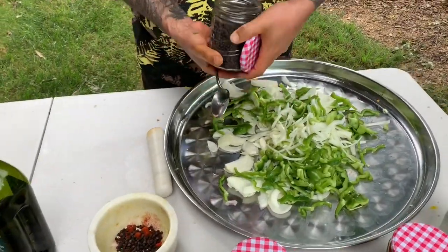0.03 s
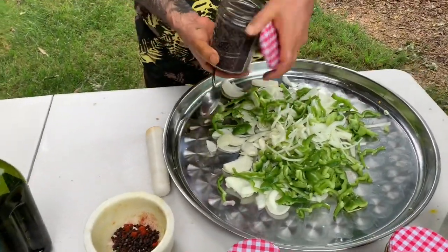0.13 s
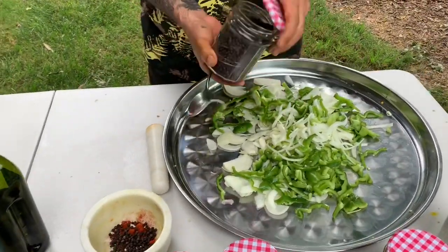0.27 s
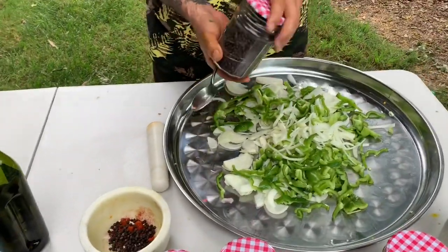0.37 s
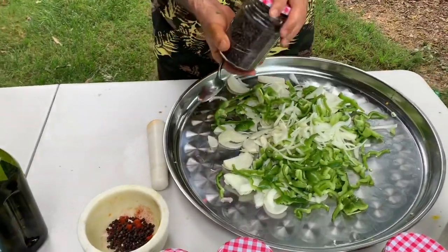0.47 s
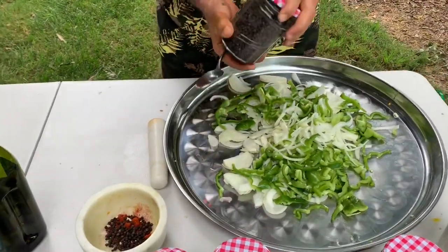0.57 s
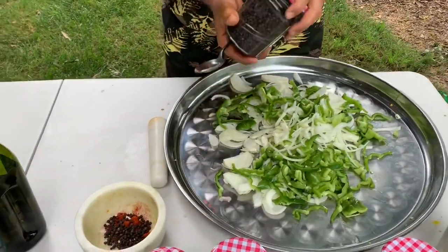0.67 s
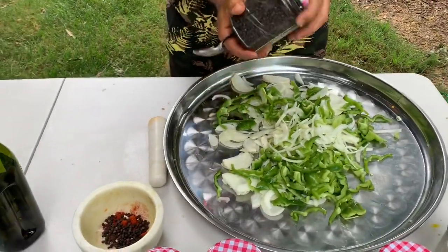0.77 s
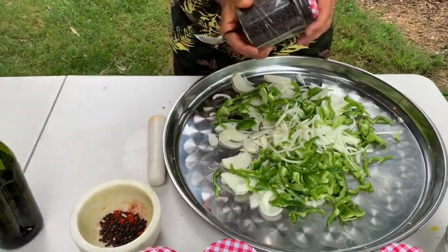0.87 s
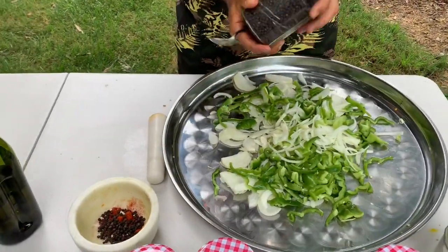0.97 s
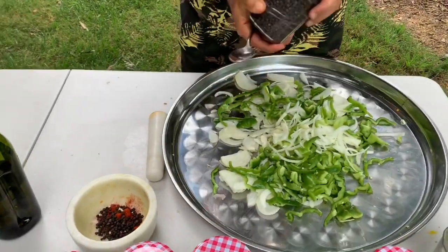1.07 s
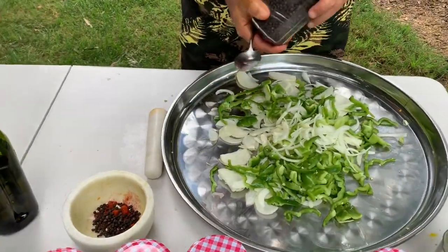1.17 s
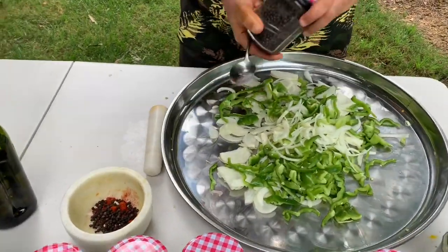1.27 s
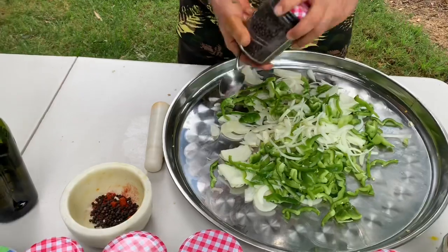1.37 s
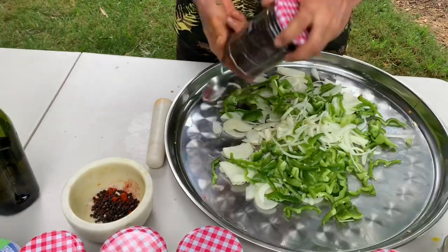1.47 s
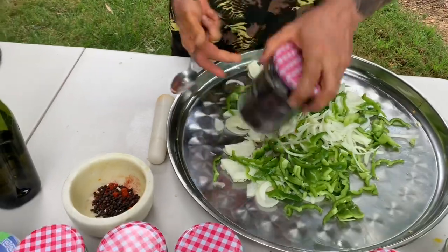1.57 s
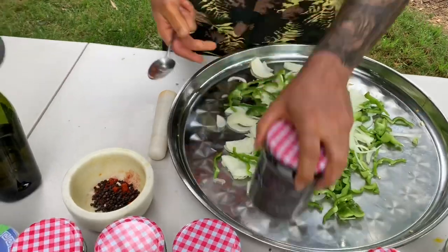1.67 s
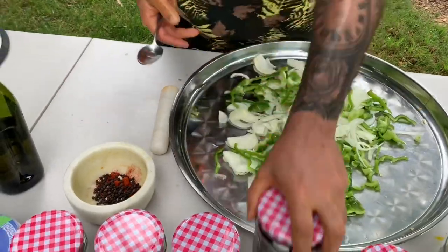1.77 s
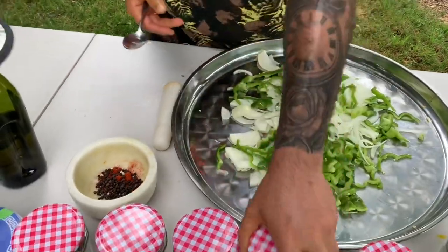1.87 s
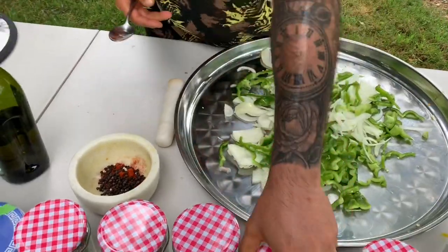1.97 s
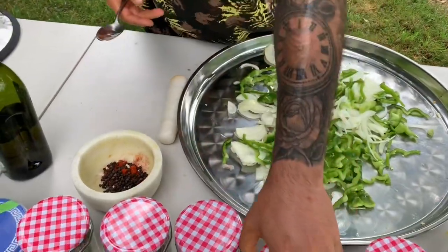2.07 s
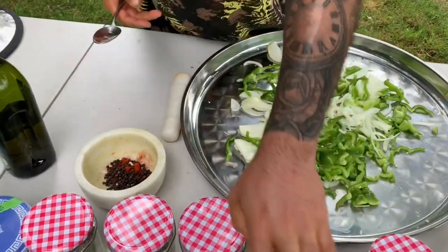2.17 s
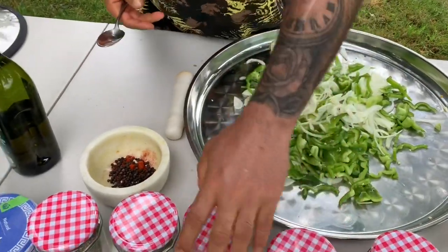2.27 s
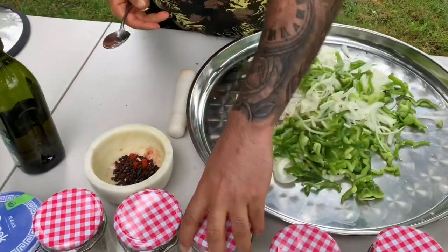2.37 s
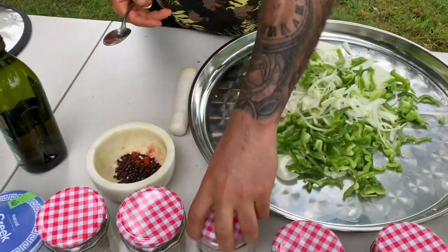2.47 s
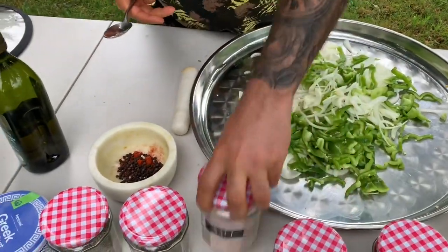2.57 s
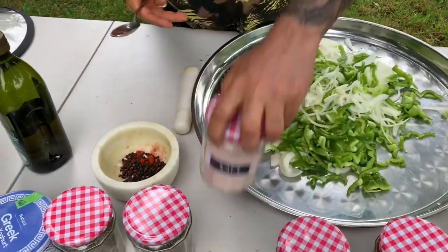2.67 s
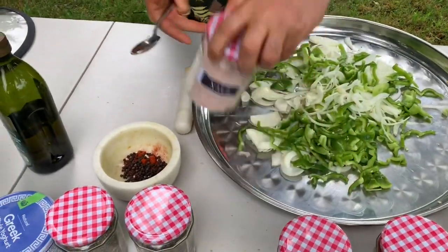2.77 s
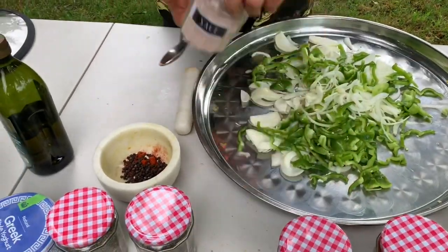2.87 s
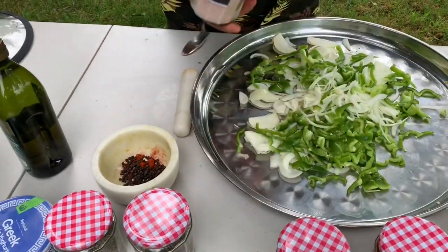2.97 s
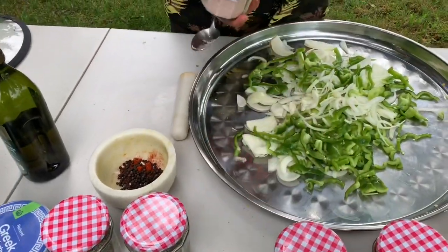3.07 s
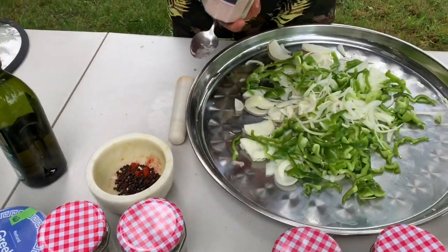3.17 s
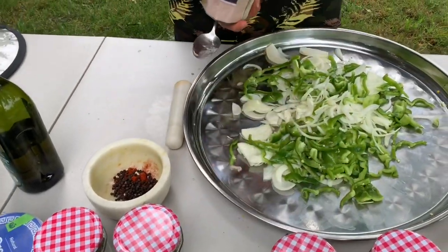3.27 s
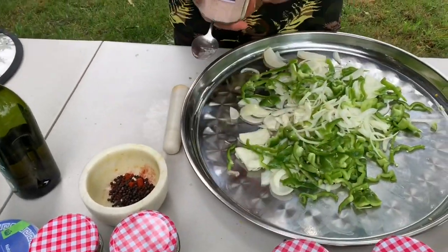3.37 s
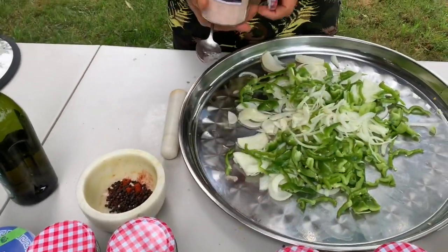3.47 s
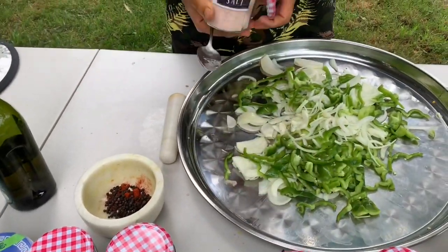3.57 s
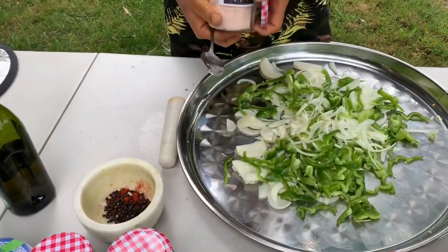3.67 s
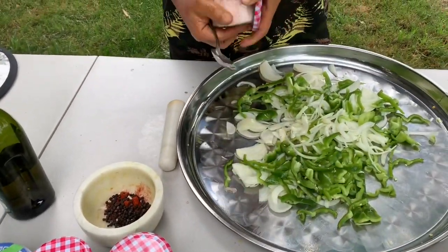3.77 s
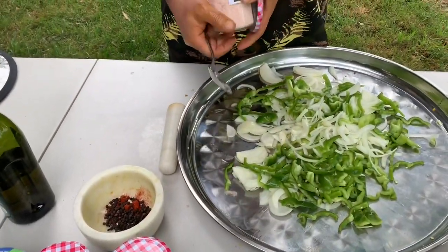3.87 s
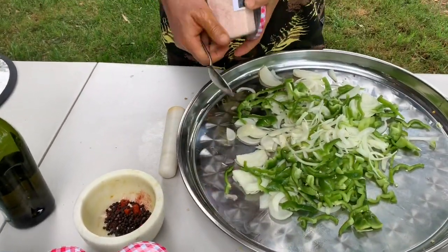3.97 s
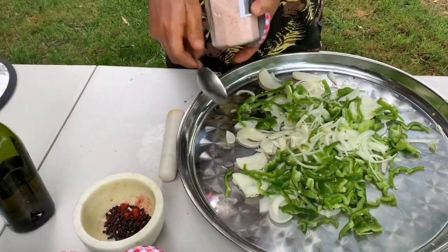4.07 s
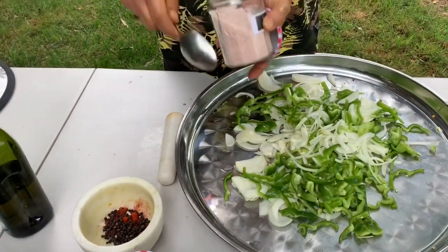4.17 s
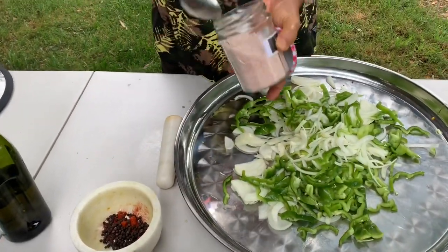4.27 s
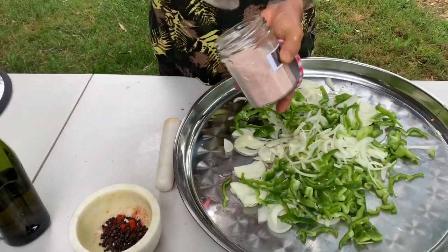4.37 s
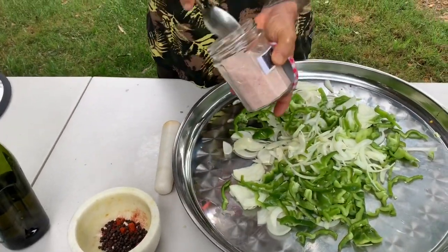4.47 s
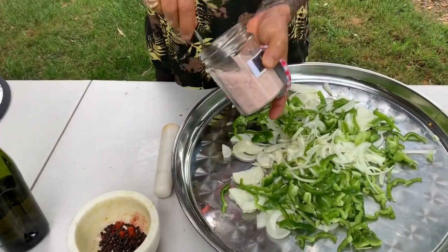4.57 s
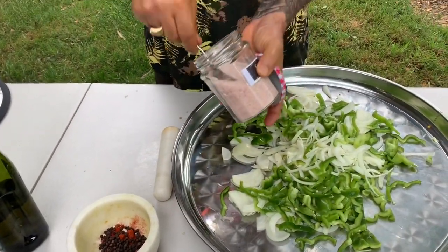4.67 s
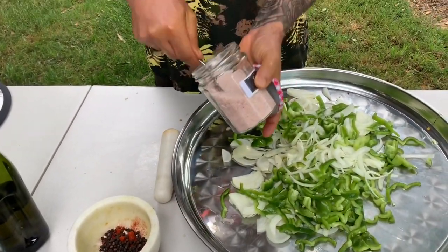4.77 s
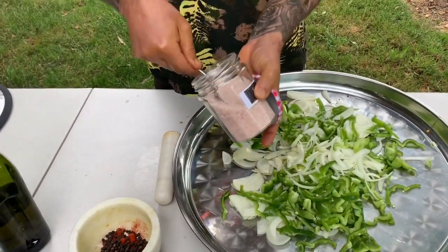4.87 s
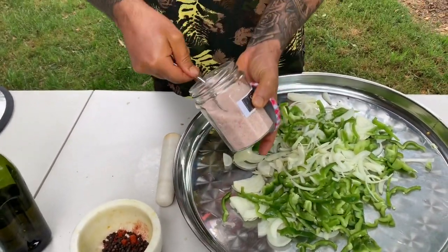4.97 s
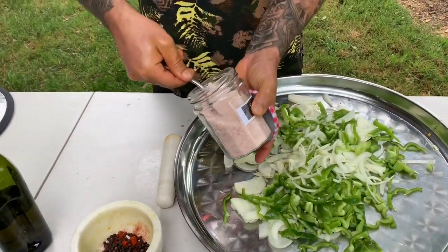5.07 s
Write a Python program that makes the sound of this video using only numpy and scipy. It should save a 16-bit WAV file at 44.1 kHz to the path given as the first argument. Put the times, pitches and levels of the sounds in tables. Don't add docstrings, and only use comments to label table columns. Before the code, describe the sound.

Outdoors, jar lids scrape and click, a heavy boomy knock hits the plastic table, jars clink, and a metal spoon taps glass.

```python
import sys
import numpy as np
from scipy import signal
from scipy.fft import rfft, irfft, next_fast_len
from scipy.io import wavfile
from scipy.ndimage import map_coordinates

SR = 44100
rng = np.random.default_rng(int(sys.argv[2]) if len(sys.argv) > 2 else 0)


def digitize_waveform(pressure):
    field = np.atleast_2d(pressure).T
    bounded = np.clip(field, -1, 1)
    quanta = np.round(bounded * 32767).astype(np.int16)
    wavfile.write(sys.argv[1], SR, quanta)


def gain_from_db(level_db):
    decades = np.asarray(level_db, float) / 20
    return 10 ** decades


N = 225218


def unit(x):
    return x / np.sqrt(np.mean(x ** 2) + 1e-20)


def peak_one(x):
    return x / np.abs(x).max()


def along(points, hz):
    f, v = np.transpose(points)
    return np.interp(np.log(hz + 1), np.log(f + 1), v)


def filtered(x, response):
    n = x.shape[-1]
    m = next_fast_len(n + 4096)
    return irfft(rfft(x, m) * response(np.fft.rfftfreq(m, 1 / SR)), m)[..., :n]


def band(centre_hz, width_hz):
    return lambda f: (1j * f * width_hz / (centre_hz ** 2 - f * f + 1j * f * width_hz)) ** 2


def noise(spectrum, shape=N):
    return unit(filtered(rng.standard_normal(shape), lambda hz: gain_from_db(along(spectrum, hz))))


def wobble(rate):
    return map_coordinates(rng.standard_normal(int(N * rate / SR) + 4), [np.arange(N) * rate / SR])


def swells(s, hold, db, release, attack):
    t = np.arange(0, N / SR, 1 / 1000)[:, None]
    early = np.maximum(s - t, 0)
    late = np.maximum(t - s - np.abs(hold), 0)
    gain = gain_from_db(db - 20 * early / np.abs(attack) - 20 * late / np.abs(release)).sum(axis=1)
    return np.interp(np.arange(N) / SR, t[:, 0], gain)


# f/Hz, density/dB
BACKGROUND_SPECTRUM = [(20, -50), (42, -28), (65, -4.5), (180, -15), (370, -20), (430, -12), (600, -23),
                       (1400, -28), (3700, -44), (10800, -45.5), (11700, -72), (12700, -50), (14300, -46.5),
                       (15000, -80)]
# f/Hz, left-right likeness
COHERENCE = [(60, 0.73), (130, 0.83), (290, 1), (640, -0.086), (1410, -0.78), (3100, -0.65), (6820, -1.1),
             (15000, 1)]


def open_air():
    def mid_and_side(hz):
        angle = np.arccos(np.clip(along(COHERENCE, hz), -1, 1)) / 2
        return gain_from_db(along(BACKGROUND_SPECTRUM, hz)) * [np.cos(angle), np.sin(angle)]

    mid, side = filtered(rng.standard_normal((2, N)), mid_and_side)
    left_right = unit(np.array([mid + side, mid - side]))
    return gain_from_db(-62 + 0.59 * wobble(1.2)) * left_right * gain_from_db([[1.1], [-1.1]])


# t/s, hold/s, level/dB, release/s, attack/s
LEG_SWAY = (2.0, .35, -55, .12, .04)


def low_hum():
    hum = noise([(20, -62.5), (40, -18.5), (60, 1.0), (80, -10.0), (140, -61.5)])
    return (gain_from_db(-60.5) + swells(*LEG_SWAY)) * hum


# t/s, hold/s, level/dB, release/s, attack/s
FAR_TONE = (2.55, .33, -74, .12, .07)


def far_tone():
    tone = np.sin(2 * np.pi * 810 * np.arange(N) / SR)
    return swells(*FAR_TONE) * gain_from_db(2.74 * wobble(7.1)) * tone


# f/Hz, width/Hz, level/dB
CHORUS_BANDS = [(2700, 330, 0.5), (8100, 250, -11.5)]
# t/s, hold/s, level/dB, release/s, attack/s
CHORUS_SWELL = (4.93, .1, -78, .06, .05)


def far_insects():
    chorus = 0
    for hz, width, db in CHORUS_BANDS:
        level = gain_from_db(db + 2.6 * wobble(1.3))
        chorus = chorus + level * unit(filtered(rng.standard_normal((2, N)), band(hz, width)))
    return (gain_from_db(-98.5) + swells(*CHORUS_SWELL)) * chorus


# f/Hz, T60/s
YARD_T60 = [(200, 0.075), (2000, 0.085), (10000, 0.06)]


def yard(x):
    hz, t, z = signal.stft(rng.standard_normal((2, SR // 3)), SR, nperseg=256)
    decay = gain_from_db(-60 * t / along(YARD_T60, hz)[:, None])
    tail = signal.istft(z * decay, SR, nperseg=256)[1]
    return signal.fftconvolve(x[None], tail / np.linalg.norm(tail[0]), axes=1)[:, :N]


# t/s, length/s, level/dB
RASPS = [
    (2.12, 0.068, -62),
    (2.207, 0.061, -61.5),
    (2.758, 0.076, -62),
    (2.86, 0.13, -57),
    (3.022, 0.053, -61),
    (3.107, 0.033, -58.5),
    (3.182, 0.051, -63),
]


def insect():
    clicks = rng.standard_normal(N) * gain_from_db(1.697 * wobble(160))
    s, length, db = np.transpose(RASPS)
    bursts = swells(s + .15 * length, 0.55 * length, db - 3.5, 0.74 * length, 0.23 * length)
    low_edge = band(centre_hz=7200, width_hz=1100)
    high_edge = band(centre_hz=7900, width_hz=1300)
    return bursts * unit(filtered(clicks, lambda f: low_edge(f) * high_edge(f)))


# t/s, hold/s, hiss level/dB, release/s per 20 dB, body over hiss/dB
HAND_MOVES = [(0, 0.0033, -64.5, 0.13, 5), (0.354, 0.039, -72, -0.5, 9.5), (0.44, 0.071, -74, -0.5, -1.5),
              (0.638, 0.15, -86, 0.53, 3), (0.8, 0.22, -61.5, 0.08, -6), (1.01, 0.051, -73.5, -0.5, -24),
              (1.2, 0.21, -87, -1.24, 0.5), (1.47, 0.098, -73.5, 1.2, -7), (1.886, 0.064, -74, 0.56, 13.5),
              (1.73, 0.11, -64, 0.13, -12), (2.936, 0.024, -62.5, 0.47, -3.5),
              (3.056, 0.24, -81, 0.19, 14.5), (3.566, 0.053, -78.5, 0.57, 16),
              (3.685, 0.0034, -62, 0.18, -15.5), (4.548, 0.023, -69.5, 0.6, 2.5)]
SEED_JOLTS = [
    (1.965, .002, -46.5, 0.043, 16.5),
    (1.987, .003, -41, 0.033, -9),
    (2.006, 0.019, -36.5, 0.011, -8.5),
    (2.03, 0.0064, -51, 0.019, -1),
    (2.045, .004, -43, 0.0123, -9),
    (2.059, 0.0079, -44, 0.016, -5.5),
    (2.08, 0.022, -61, 0.057, 6.5),
]
# f/Hz, density/dB
HISS_SPECTRUM = [(1470, -34.5), (2500, -5), (5010, -7.5), (8300, -6.5), (11800, -13), (13000, -10.5),
                 (14800, -13), (16500, -44)]
BODY_SPECTRUM = [(350, -42), (600, -10.5), (777, -9), (1250, -13.5), (2640, -14), (3500, -31), (7700, -120)]
# f/Hz, width/Hz, level/dB
GLASS_BANDS = [(2340, 280, 1), (8250, 330, 3)]


def rustle():
    impulses = (rng.random(N) < 170 / SR) * rng.uniform(0, .6, N)
    ticks = signal.lfilter([1], [1, -.985], impulses)
    clumps = gain_from_db(2.6 * wobble(50) + 3 * wobble(300)) * (1 + ticks)

    def glass(f):
        return 1 + sum(gain_from_db(db) * np.abs(band(hz, width)(f)) for hz, width, db in GLASS_BANDS)

    s, hold, level_db, release, body_db = np.transpose(HAND_MOVES + SEED_JOLTS)
    attack = np.repeat([.04, .007], [len(HAND_MOVES), len(SEED_JOLTS)])
    hiss = unit(clumps * filtered(noise(HISS_SPECTRUM), glass))
    body = unit(clumps * noise(BODY_SPECTRUM))
    hiss = swells(s, hold, level_db, release, attack) * hiss
    return hiss + swells(s, hold, level_db + body_db, release, attack) * body


# t/s, f/Hz
NECK_PITCH = [
    [(.3, 270.8), (.55, 268), (.7, 261.4), (.768, 294.7), (.81, 288.5), (.85, 253.5), (.93, 249),
     (.956, 228.9), (1.03, 218.6)],
    [(2.9, 339), (2.96, 330.5), (3.03, 325.8), (3.066, 282), (3.12, 292), (3.2, 305), (3.7, 313)],
]


def neck_hz(s):
    return np.interp(s, *np.transpose(NECK_PITCH[0] + NECK_PITCH[1]))


# t/s, hold/s, level/dB, release/s, attack/s
NECK_RUBS = [
    (0.354, .04, -54, 0.032, 0.0083),
    (0.552, .07, -56.5, 0.033, .01),
    (0.721, .03, -42.5, .02, 0.017),
    (0.81, .03, -60, 0.034, 0.0092),
    (0.859, .055, -49, 0.027, .015),
    (0.935, .03, -53, 0.025, 0.018),
    (2.908, .025, -53, 0.027, .01),
    (3.095, .035, -51.5, 0.019, 0.0093),
    (3.159, .05, -58, .015, .02),
]


def neck_hum():
    phase = 2 * np.pi * np.cumsum(neck_hz(np.arange(N) / SR)) / SR
    air = unit((.6 + wobble(55)) * np.sin(phase) + wobble(55) * np.cos(phase))
    return swells(*np.transpose(NECK_RUBS)) * gain_from_db(-1.5) * air


# f/Hz, width/Hz, level/dB
BOWL_BANDS = [(12640, 540, -1.5), (15650, 116, -3), (7700, 2100, 1.5)]
# t/s, hold/s, level/dB, release/s, attack/s
BOWL_SLIDES = [
    (4.47, .02, -53, .03, .01),
    (4.513, 0.022, -61, 0.045, .005),
    (4.56, 0.11, -68.5, .05, .03),
]


def spoon_shimmer():
    def steel(f):
        return sum(gain_from_db(db) / np.sqrt(width) * band(hz, width)(f) for hz, width, db in BOWL_BANDS)

    return swells(*np.transpose(BOWL_SLIDES)) * unit(filtered(rng.standard_normal(N), steel))


def ring(modes, t, scatter_db, detune, phase_spread=1):
    hz, db, t60 = np.transpose(modes)[:, :, None]
    strength, phase, pitch, near, far = rng.standard_normal((5, len(modes), 1))
    turn = 2 * np.pi * hz * (1 + detune * pitch) * t
    group = np.sin(turn + phase_spread * phase)
    group = group + .4 * np.sin(turn * (1 + .025 * near)) + .22 * np.sin(turn * (1 + .09 * far))
    decay = gain_from_db(db + scatter_db * strength - 60 * t / t60)
    return (decay * group).sum(0) * (1 - np.exp(-t / .0003))


# f/Hz, level/dB, T60/s
JAR_AIR = [(275.3, 1, 0.044)]
# f/Hz, density/dB
SCRAPE_SPECTRUM = [(290, -55.5), (500, -27), (859, -20.5), (1430, -5.5), (1840, -10), (2040, -10),
                   (2390, -3.5), (3880, -8), (10300, -8.5), (11600, -18.5), (13100, -5.5), (16500, -36)]


def contacts(events, modes, hollow, thud_db, t60, tilt_db, thud_attack=.003, scatter_db=3, detune=.01):
    lead = SR // 50
    out, t = np.zeros(N + SR), np.arange(SR // 3) / SR
    u = t - lead / SR
    lead_in = gain_from_db(-20 + 1500 * u)
    strike = gain_from_db(-60 * u / t60) * (1.1 - np.exp(-u / (0.035 * t60)))
    force = np.where(u < 0, lead_in, strike)
    for s, db, ring_db, *low_db in events:
        grit = filtered(noise(SCRAPE_SPECTRUM, len(t)),
                        lambda hz: gain_from_db(tilt_db * np.log2(np.maximum(hz, 700) / 3000)))
        scrape = gain_from_db(-13) * force * unit(grit)
        drive = .05 * force ** 2 * rng.standard_normal(len(t))
        drive[lead + round(.05 * t60 * SR)] += 1
        flutter = map_coordinates(rng.standard_normal(180), [t * 180])
        ringing = ring(modes, t[:SR // 4], scatter_db, detune)
        driven = signal.fftconvolve(drive[:SR // 8], ringing)[:len(t)]
        body = gain_from_db(ring_db + 1.8 * flutter - 60 * t) * peak_one(driven)
        shift = neck_hz(s) / hollow[0][0] if hollow is JAR_AIR else 1
        swell = ring(hollow, shift * t, 1.5, 0.03, phase_spread=0) * (1 - np.exp(-t / thud_attack))
        thud = gain_from_db(sum(low_db) + thud_db) * peak_one(np.pad(swell, (lead, 0))[:len(t)])
        out[round(s * SR) - lead:][:len(t)] += gain_from_db(db) * (scrape + body + thud)
    return out[:N]


# f/Hz, level/dB, T60/s
TILTED_GLASS = [(860, -10.5, 0.087), (1080, -10.5, .05), (1420, -8, 0.052), (2090, -0.5, 0.056),
                (2400, -4.5, .04), (3736, -17.5, 0.084), (8010, -15.5, .025), (10030, -15.5, .02)]
# t/s, peak level/dB, ring/dB
SEED_TICKS = [(.8896, -44, -11), (.9755, -34, -22), (1.062, -56, -27), (1.0732, -57, -25),
              (1.086, -54, -17), (1.1221, -46, -18), (1.151, -44, -15), (1.7795, -50, -25),
              (1.8483, -47, -16), (1.9037, -44.5, -10.5), (2.0445, -32, -15), (3.678, -38, -10),
              (3.687, -38, 1)]
# t/s, peak level/dB, ring/dB
EDGE_TAPS = [
    (.5385, -37, 3),
    (.8562, -38.5, 0.5),
    (.9502, -35, -3),
    (1.0142, -35, -1.5),
    (2.3555, -43, -7),
]
# f/Hz, level/dB, T60/s
EDGE_MODES = [(865, -5, 0.017), (1020, -4, 0.018), (1235, -10, 0.025), (1450, -4.5, 0.022),
              (1896, -6, 0.021), (2350, 1.5, 0.029)]
# t/s, peak level/dB, ring/dB
HANDLE_KNOCKS = [
    (4.4424, -31.5, 0),
    (4.4641, -34.5, 0.0054),
    (4.507, -40.5, 0),
]
# f/Hz, level/dB, T60/s
HANDLE_MODES = [(313, -3.5, 0.049), (592, -5, 0.023), (893, -9, 0.032), (1183, -4, 0.044), (1500, 0, 0.047),
                (1720, -4.5, 0.061)]


def small_contacts():
    hits = contacts(SEED_TICKS, TILTED_GLASS, JAR_AIR, thud_db=-40.5, t60=.01, tilt_db=2.0)
    hits += contacts(EDGE_TAPS, EDGE_MODES, JAR_AIR, thud_db=-40, t60=.011, tilt_db=-1.5)
    return hits + contacts(HANDLE_KNOCKS, HANDLE_MODES, JAR_AIR, thud_db=-30, t60=.025, tilt_db=-5)


# t/s, hold/s, level/dB, release/s, attack/s
TABLE_SLIDES = [
    (1.904, 0.041, -37, .01, 0.037),
    (1.964, 0.035, -26, 0.13, 0.0092),
    (2.36, 0.048, -42.5, 0.051, 0.016),
]
# f/Hz, density/dB
BOARD_SPECTRUM = [(29, -45), (55, -17), (91, 0), (151, -10.5), (210, -10), (414, -4.5), (479, -3.5),
                  (651, -20.5), (1200, -26), (2640, -120)]
# t/s, peak level/dB, ring/dB
BASE_KNOCK = [
    (1.951, -0.58, -1.9),
]
# t/s, peak level/dB, ring/dB, thud/dB
JAR_LANDING = [
    (1.9585, -8, -4.5, 7.1),
    (1.9647, -18.5, -13, 10),
]
JAR_ROCKING = [
    (1.9887, -17, -19, -4),
    (2.0056, -20.5, -15, 0.5),
    (2.0169, -29, -6, -5),
    (2.0612, -25, -26, -9),
    (2.1215, -40.5, -19, 5.5),
    (2.358, -44, -11, 10),
    (2.371, -47, -3, 8.5),
    (2.4101, -51, -1.5, 5.5),
    (1.884, -45, -2, -5.5),
]
# f/Hz, level/dB, T60/s
BASE_MODES = [(2680, -6, 0.017), (3400, -4.5, 0.012), (4700, -1.5, 0.012), (4640, 2, 0.0086),
              (6540, -11.5, 0.011)]
STANDING_JARS = [(1020, -7.5, 0.085), (1370, -7, 0.036), (2040, -10, 0.062), (2140, -9, 0.019),
                 (3060, 1, 0.044), (3710, -16.5, .015)]
TABLE_TOP = [(84, -10.5, .25), (117, -4.5, 0.055), (165, -1.5, 0.06), (218.2, -5, 0.039),
             (264.7, -5.5, 0.041), (391, -9, 0.049), (462, -0.5, 0.052), (523, -4.5, 0.038),
             (636, -7.5, 0.029), (776, -10, 0.038)]


def table():
    grumble = unit(gain_from_db(4 * wobble(60)) * noise(BOARD_SPECTRUM))
    sound = swells(*np.transpose(TABLE_SLIDES)) * grumble
    sound += contacts(BASE_KNOCK, BASE_MODES, TABLE_TOP, thud_attack=0.00084, thud_db=-8.0, t60=.01,
                      tilt_db=0.54, scatter_db=0.74)
    sound += contacts(JAR_LANDING, STANDING_JARS, TABLE_TOP, thud_attack=.0012, thud_db=0.5, t60=0.016,
                      tilt_db=-6.5, detune=0.063)
    return sound + contacts(JAR_ROCKING, STANDING_JARS, TABLE_TOP, thud_db=2.1, t60=.026, tilt_db=-1.1,
                            detune=.02)


# t/s, peak level/dB, ring/dB, thud/dB (none for the fingers)
SEED_LID_OFF = [
    (0.3328, -26.5, 4, -22),
    (0.3501, -13, -3.5, -22),
    (0.3794, -27.5, -1, -16.5),
    (0.4464, -17, -8.5, -32),
    (0.4496, -17, -12.5, -21.5),
    (0.4617, -21.5, -3.5, -9.5),
    (0.4897, -29, -0.5, -15.5),
    (0.5382, -35, -5, -14),
    (0.553, -39.5, -20, -10.5),
]
SEED_LID_ON = [(0.7175, -25.5, -5.5, -12), (0.7375, -25, -0.5, -8.5), (0.7549, -20, -0.5, -31),
               (0.7609, -5, -7, -17), (0.7967, -25.5, -4.5, -21), (0.8564, -33.5, -16, -13),
               (0.95, -31, -7, -7), (0.9658, -31, -29, -22.5), (1.009, -44, -33, -2),
               (1.0141, -25.5, -30, -22.5), (1.0318, -44, -19, -15), (1.105, -38, -18, -39),
               (1.1617, -42, -12, -22)]
FINGER_TAPS = [
    (1.5334, -42, -27),
    (1.5633, -40, -19),
    (1.6809, -43, -24),
    (1.7072, -43, -20),
    (4.2983, -53.5, -16),
]
# f/Hz, level/dB, T60/s
SEED_JAR = [(899, -10.5, 0.1), (1099, -5.5, 0.087), (1430, -8.5, .04), (1477, -7.5, 0.035),
            (1588, -6.5, .035), (2240, -3, 0.037), (2934, -7, 0.051), (3820, -9.5, 0.027),
            (4485, -1, 0.024), (8600, -13, 0.011), (10140, -1, 0.012), (12950, -4, 0.017)]


def seed_jar():
    hits = contacts(SEED_LID_OFF, SEED_JAR, JAR_AIR, thud_attack=0.011, thud_db=2.5, t60=0.039,
                    tilt_db=-0.5, detune=0.022)
    hits += contacts(SEED_LID_ON, TILTED_GLASS, JAR_AIR, thud_db=1.1, t60=.021, tilt_db=-.4,
                     scatter_db=1.5, detune=0.016)
    return hits + contacts(FINGER_TAPS, TILTED_GLASS, JAR_AIR, thud_db=-28.0, t60=0.0418, tilt_db=4.5,
                           detune=0.014)


# t/s, peak level/dB, ring/dB (the grip adds thud/dB)
JAR_CLINK = [
    (2.9045, -9, -1.2),
]
JAR_GRIP = [
    (3.024, -38.5, -7, -10.5),
    (3.0689, -27, 1.5, -8.5),
    (3.0878, -32, -13.5, -5),
    (3.1918, -37, -9, -10),
]
LID_TWIST = [
    (3.2408, -36.5, 4.5),
    (3.2525, -46, 6),
]
TIN_SLIPS = [
    (3.535, -22, 3.5),
    (3.5859, -31, 5),
    (3.6189, -17, -6.5),
    (3.639, -20, -13),
    (3.6642, -35.5, -4.5),
]
TIN_LID_OFF = [
    (3.7074, -12.5, -22),
    (3.709, -10.5, -4),
    (3.714, -14.5, -2.5),
    (3.7194, -20, 1),
    (3.7344, -26.5, -0.5),
]
# f/Hz, level/dB, T60/s
CLINKING_JARS = [(1000, -19, .045), (1620, -9, .04), (1900, -10, .035), (2272, -15, .045),
                 (2918, -14, .055), (3400, -11, .025), (4780, -12, .03), (6940, -1, .075), (7700, 0, .04),
                 (8560, -5, .07), (9205, -5, .035), (9720, -9, .05), (11390, -8, .04), (12330, -13, .05)]
HELD_JAR = [(840, -10.5, 0.14), (1015, 3.5, 0.033), (1620, -5, 0.059), (2235, -9.5, 0.12),
            (7580, -21, 0.11), (8830, -11.5, 0.049)]
LID_THREAD = [(798, -6, 0.07), (1176, -3, 0.24), (1360, -2, 0.09), (2283, 6, 0.094), (2976, 8, 0.061),
              (3620, 3.5, 0.072), (3900, -5, 0.06), (6100, -1, 0.12), (7910, 6, 0.054), (9800, 1, 0.041)]
TIN_LID = [(1147, -8.5, 0.13), (1703, -16, 0.11), (2170, 2.5, 0.17), (2350, -2, 0.11), (2860, -7.5, 0.094),
           (3004, -4, 0.13), (4624, -13, 0.11), (5870, -18, 0.064), (8400, -6.5, 0.011), (9960, -8.5, .025),
           (13490, 2.5, .02)]
OPEN_JAR = [(968, -17.5, 0.1), (1273, -17.5, 0.12), (1770, -18, 0.074), (2402, 0.5, 0.07),
            (2570, -5.5, 0.029), (2972, -3, 0.053), (4080, -11, 0.057), (5200, -27, 0.068),
            (9006, -14.5, .05), (10370, -11, 0.037)]


def second_jar():
    hits = contacts(JAR_CLINK, CLINKING_JARS, JAR_AIR, thud_db=-37, t60=.024, tilt_db=-.8, scatter_db=0,
                    detune=0)
    hits += contacts(JAR_GRIP, HELD_JAR, JAR_AIR, thud_db=0.7, t60=0.042, tilt_db=-3.0, detune=0.0342)
    hits += contacts(LID_TWIST, LID_THREAD, JAR_AIR, thud_db=-24, t60=0.046, tilt_db=-3.0, detune=0.0033)
    hits += contacts(TIN_SLIPS, TIN_LID, JAR_AIR, thud_db=-35, t60=0.0292, tilt_db=-2.0, scatter_db=5.0,
                     detune=0.003)
    return hits + contacts(TIN_LID_OFF, OPEN_JAR, JAR_AIR, thud_db=-24.5, t60=0.025, tilt_db=0.5)


# t/s, peak level/dB, ring/dB
SPOON_HITS = [
    (4.4422, -18.5, 0),
    (4.4509, -24, 1.6),
    (4.4637, -16, -9),
]
RIM_TAPS = [
    (4.5069, -14, 2),
    (4.512, -23.5, -4),
]
# f/Hz, level/dB, T60/s
SPOON_STEEL = [(2280, -2, 0.041), (2500, -6, .05), (2840, -12, 0.13), (4580, -18, .06), (5970, -15, .05),
               (7100, -7, 0.1), (8100, -8.5, .07), (8570, -3.5, 0.047), (9900, -14, 0.036),
               (12730, -4, 0.11), (13650, -11, .1), (15600, -7, .14)]
JAR_RIM = [(2340, -4, .028), (2537, 2.5, 0.024), (2833, -8.5, 0.034), (4190, -12.5, 0.048),
           (6040, -18, .025), (7680, 1.5, 0.034), (12760, -33, 0.15)]


def spoon():
    hits = contacts(SPOON_HITS, SPOON_STEEL, JAR_AIR, thud_db=-33, t60=.024, tilt_db=1.5, scatter_db=1.5)
    return hits + contacts(RIM_TAPS, JAR_RIM, JAR_AIR, thud_db=-69, t60=0.013, tilt_db=-0.5, scatter_db=-5)


# f/Hz, level/dB and f/Hz, phase/rad
PORT_LEVEL = [(60, -1.5), (110, -2), (200, -1.5), (380, -2.5), (700, -7.5), (1290, -2.5), (2380, -1.5),
              (4400, -2), (8120, -5.5), (15000, 1.5)]
PORT_PHASE = [(30, .6), (80, .3), (300, .3), (1500, -.8), (2200, 1.1), (5000, 1.0), (8000, 2.0),
              (12000, 1.6)]


def ports(x):
    def half(hz):
        return gain_from_db(along(PORT_LEVEL, hz) / 2) * np.exp(.5j * along(PORT_PHASE, hz))

    return filtered(np.array([x, x]), lambda hz: np.array([half(hz), 1 / half(hz)]))


def scene():
    hits = seed_jar() + second_jar() + spoon() + table()
    near = ports(hits + rustle()) + gain_from_db(-18) * yard(hits)
    rasps = insect() * gain_from_db([[1.5], [-1.5]])
    background = open_air() + low_hum() + far_tone() + far_insects()
    small = neck_hum() + spoon_shimmer() + small_contacts()
    return near + rasps + background + ports(small)


def top_cut(x):
    return signal.sosfilt(signal.butter(12, 17010, fs=SR, output="sos"), x)


# f/Hz, level/dB
TREBLE_SHAPE = [(11100, 1), (11750, -4.5), (12400, 1), (14300, 1), (15000, -5), (16600, -7.5), (17000, -69)]


def record(dry):
    cut_hz = 38
    wet = filtered(dry, lambda hz: gain_from_db(along(TREBLE_SHAPE, hz)) * (1j * hz / (cut_hz + 1j * hz)) ** 2)
    held = wet / (1 + np.abs(wet / .86) ** 6) ** (1 / 6)
    return top_cut(held)


dry = scene()
out = record(dry)
digitize_waveform(out)
```